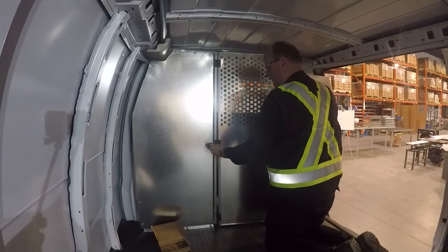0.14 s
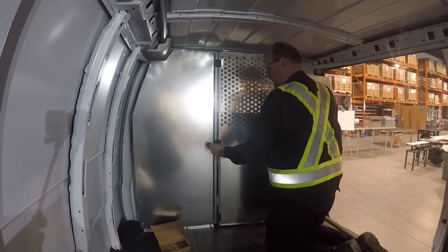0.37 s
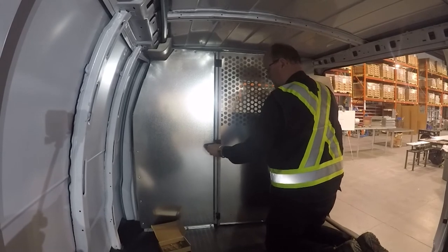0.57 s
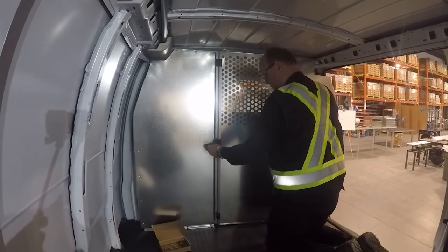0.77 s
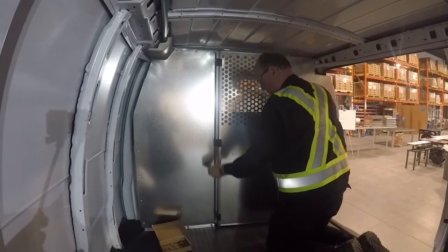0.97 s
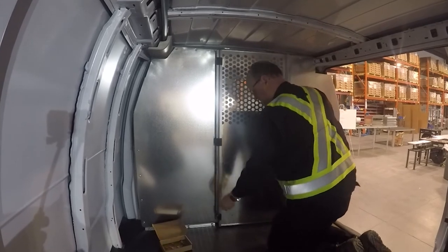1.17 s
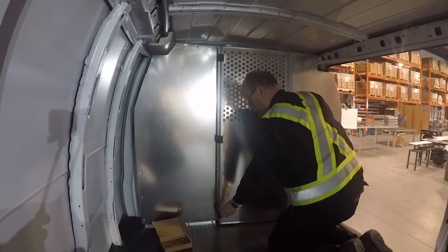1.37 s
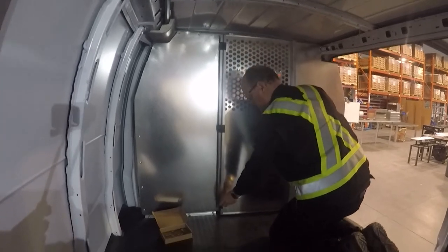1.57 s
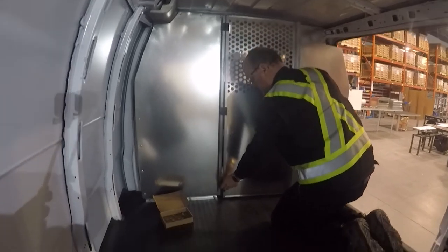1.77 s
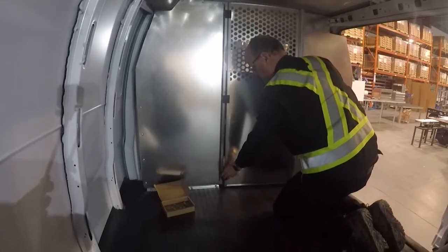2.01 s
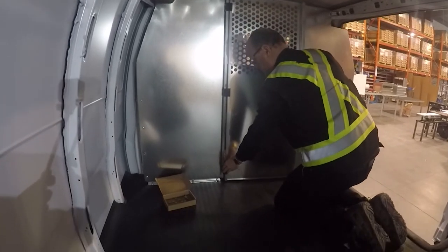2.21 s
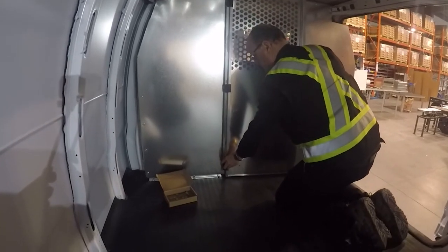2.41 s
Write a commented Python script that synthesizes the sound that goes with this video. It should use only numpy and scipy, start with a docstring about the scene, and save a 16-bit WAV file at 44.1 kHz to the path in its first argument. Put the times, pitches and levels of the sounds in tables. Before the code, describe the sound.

A heavy steel door knocks, grinds and is tapped onto its hinges inside a bare van

```python
"""Inside a bare van, over a quiet hall, a steel door is lowered onto its hinges: it knocks, grinds and is tapped home.
Knocks are a click and a dying chatter, grinding is dense tiny clicks: both ring the steel and the van,
as fading noise plus clear tones. The van's panels boom and its body shudders as random jolts ring low tones.
A soft thud, louder on the left, is a short push ringing low tones; the hall is steady coloured noise."""
import sys
import numpy as np
from scipy import signal
from scipy.fft import rfft, irfft, next_fast_len
from scipy.io import wavfile
from scipy.ndimage import uniform_filter1d

SR = 44100
rng = np.random.default_rng(int(sys.argv[2]) if len(sys.argv) > 2 else 0)


def materialize(psi):
    """Save the field psi as 16-bit PCM at rate SR to the path in sys.argv[1].

    A 1-D psi becomes a single channel; in a 2-D psi each row is a channel.
    """
    bounded = np.clip(np.atleast_2d(psi).T, -1, 1)
    quanta = np.round(bounded * 32767).astype(np.int16)
    wavfile.write(sys.argv[1], SR, quanta)


N = 108045  # samples, 2.45 s


def from_db(db):
    """Turns decibels into a plain factor."""
    return 10 ** (np.asarray(db) / 20)


def rms_one(x):
    """Scales a signal to an rms of 1."""
    return x / np.sqrt(np.mean(x ** 2) + 1e-20)


def low_pass(x, order, hz):
    """Keeps what lies below a pitch."""
    return signal.sosfilt(signal.butter(order, hz, fs=SR, output="sos"), x)


def at_hz(points, hz):
    """Reads a two-column table at a pitch, on a logarithmic pitch scale."""
    points = np.array(points)
    return np.interp(np.log(hz), np.log(points[:, 0]), points[:, 1])


def in_time(rows):
    """Joins timed rows with straight lines: one curve for each column after the time."""
    start_s, *columns = np.transpose(rows)
    t = np.arange(N) / SR
    return np.array([np.interp(t, start_s, column) for column in columns])


def ring(x, hz, t60):
    """One ringing tone, falling 60 dB in t60 seconds; a unit click rings at height 1."""
    r = from_db(-60 / (t60 * SR))
    w = 2 * np.pi * hz / SR
    return signal.lfilter([0, np.sin(w)], [1, -2 * r * np.cos(w), r * r], x + 1e-18)


def pair(two, alike, lean_db):
    """Makes left and right from a shared and an opposed signal; a positive lean favours the left."""
    alike = np.clip(alike, -1, 1)
    sides = np.array([[1], [-1]])
    stereo = np.sqrt(1 + alike) * two[0] + np.sqrt(1 - alike) * two[1] * sides
    return stereo * from_db(lean_db / 2 * sides)


GRAIN_SPREAD_DB = 2  # average extra size of a click, before the cap of 4 times this


def grains(per_s):
    """Uneven clicks of random sign at random moments, rms 1."""
    sizes_db = GRAIN_SPREAD_DB * np.minimum(rng.exponential(1, N), 4)
    sizes = from_db(sizes_db) * rng.choice([-1, 1], N)
    return rms_one(sizes * (rng.random(N) < per_s / SR))


# how alike left and right are: pitch_hz, likeness (1 = same, -1 = opposed)
STEREO_LIKENESS = [(60, 0.7), (150, 0.3), (380, 0.92), (950, -0.055), (2380, 0.46), (5980, 0.38),
                   (9000, -0.25), (15000, -0.55)]
# how far the sound leans to the left: pitch_hz, left_over_right_db
STEREO_LEAN = [(60, -3.5), (150, 0.5), (380, -5.5), (950, 1.5), (2380, 1.5), (5980, 1.5), (9000, -4),
               (15000, -0.5)]
EDGES_HZ = 250 * 4 ** np.arange(0, 3.01, 1 / 8)  # quarter-octave steps


def bands(spectrum, size):
    """Quarter-octave stereo noise bands, coloured by a spectrum, with their centre pitches."""
    white = rng.standard_normal((2, 2, size))
    for k, (low, high) in enumerate(zip(EDGES_HZ, EDGES_HZ[1:])):
        hz = np.sqrt(low * high)
        band = signal.butter(3, [low, high], "band", fs=SR, output="sos")
        two = signal.sosfilt(band, white[k % 2])  # neighbours use different noise
        yield hz, from_db(at_hz(spectrum, hz)) * pair(two, at_hz(STEREO_LIKENESS, hz), at_hz(STEREO_LEAN, hz))


# colour of the quiet hall: pitch_hz, relative_level_db (per Hz)
HALL_COLOUR = [(150, -35), (250, -6), (333, -13.5), (350, -9), (799, -15), (1520, -22), (5270, -30),
               (11400, -29), (14000, -57)]
HALL_FLOOR_DB = -69  # rms


def quiet_hall():
    """The hall is steady noise, built from bands and set to a low level."""
    noise = sum(band for hz, band in bands(HALL_COLOUR, N))
    return from_db(HALL_FLOOR_DB) * rms_one(noise)


JOLTS_PER_S = 300


def shaken(modes, db, alike, lean_db, tilt_db=0):
    """Random jolts ring low tones; the result is evened out and follows a level curve."""
    lowest_hz, highest_hz = modes[0][0], modes[-1][0]
    two = []
    for _ in range(2):
        tones = 0
        for hz, mode_db, t60 in modes:
            gain = from_db(mode_db + tilt_db * np.log2(hz / lowest_hz))
            tones = tones + gain * ring(grains(JOLTS_PER_S), hz, t60)
        two.append(tones)
    two = low_pass(np.array(two), 2, highest_hz * 1.1)
    two = signal.sosfilt(signal.butter(4, lowest_hz * 0.46, "high", fs=SR, output="sos"), two)
    out = pair(two, alike, lean_db)
    loudness = np.sqrt(uniform_filter1d(np.mean(out ** 2, axis=0), size=3000) + 1e-9)
    return from_db(db) * out / loudness


# the van body shaking on its springs: start_s, level_db, left_over_right_db
SHUDDER_LEVELS = [(0.0, -65, -6), (0.4, -64, -8), (0.55, -31, -1.5), (0.62, -37, -5), (0.94, -38.5, -0.5),
                  (1.13, -27, -6.5), (1.15, -33.5, -9), (1.37, -30, -16), (1.43, -43.5, -14.5),
                  (1.48, -41.5, -5.5), (1.64, -38.5, -12), (1.68, -44.5, 3), (1.73, -37, -14),
                  (1.89, -35.5, -7), (1.96, -41, -10.5), (2.45, -51.5, -4)]
# low tones of the body: pitch_hz, relative_level_db, t60_s (time to fall 60 dB)
BODY_TONES = [(32.7, -14.5, 0.34), (51.15, 0.5, 0.15), (78.2, 0, 0.21), (82, -11, 0.14), (120, 3.5, 0.081)]
BODY_LIKENESS = 0.63  # left-right


def body_shudder():
    """The body shakes on its springs: jolts ring its deepest tones."""
    level_db, lean_db = in_time(SHUDDER_LEVELS)
    return shaken(BODY_TONES, level_db, BODY_LIKENESS, lean_db)


# the wall panels booming: start_s, level_db, lift_of_higher_panels_db (per octave)
BOOM_LEVELS = [(0.0, -67, -3), (0.05, -58.5, -6), (0.222, -76, 3), (0.24, -50, 48), (0.3, -34.5, 14.5),
               (0.37, -44, -3), (0.39, -37, 33), (0.47, -26, 8), (0.52, -26, 8), (0.7, -42, 16.5),
               (0.97, -37.5, 5), (0.99, -29.5, 5), (1.34, -46, -7), (1.37, -40.5, -33), (1.49, -61.5, 2.5),
               (1.77, -67.5, 21), (1.88, -33, 29), (2.0, -44.5, -32), (2.05, -57.5, 14), (2.45, -72, 18)]
# tones of the panels: pitch_hz, relative_level_db (before the lift), t60_s
PANEL_TONES = [(167.5, -3, 0.18), (215, -13.5, 0.17), (252.3, -15.5, 0.16)]
PANEL_LIKENESS, PANEL_LEAN_DB = 0.96, -2.1  # left-right likeness; leans to the right


def panel_boom():
    """The wall panels boom: jolts ring tones whose balance changes over time."""
    level_db, lift_db = in_time(BOOM_LEVELS)
    return shaken(PANEL_TONES, level_db, PANEL_LIKENESS, PANEL_LEAN_DB, lift_db)


# start, peak of the knock before the left-right tilt, and where its treble is cut
THUD_S, THUD_DB, THUD_CUT_HZ = 1.359, -38, 610
THUD_T60_S, PUSH_SAMPLES = .07, 500
BUMP_HZ, BUMP_DB, BUMP_T60_S = 95, -17, .16  # low weight, level before its low-pass and left-right tilt


def thud():
    """A soft, rough push rings four short tones and one low bump, louder on the left."""
    push, at = np.zeros(N), int(THUD_S * SR)
    fade = np.linspace(1, 0, PUSH_SAMPLES) ** 2
    push[at:at + PUSH_SAMPLES] = rng.choice([-1, 1], PUSH_SAMPLES) * fade
    knock = sum(rms_one(ring(push, hz, THUD_T60_S)) for hz in (297.6, 345.6, 432, 528))
    dull = low_pass(knock, 4, THUD_CUT_HZ)
    bump = low_pass(ring(np.arange(N) == at, BUMP_HZ, BUMP_T60_S), 2, 2 * BUMP_HZ)
    both = from_db(THUD_DB) * dull / np.abs(dull).max() + from_db(BUMP_DB) * bump
    return both * from_db([[3], [-3]])


# how long the van rings: pitch_hz, t60_s
VAN_DECAY = [(300, 0.13), (1000, 0.25), (2000, 0.38), (4000, 0.33), (8000, 0.27), (14000, 0.083)]
# where the low-mid, mid and treble parts end, air lying above: pitch_hz
PART_TOPS_HZ = [1150, 4000, 8000]
HALL_DB, HALL_STRETCH = -23, 3.66  # slower tail from the open doorway: level at 2 kHz, times the van's t60
BUILD_S = 0.0036  # time constant of the ring building up
CRACK_DB, CRACK_S = 6, .002  # direct sound of each click: level over the ring, time constant


def answer(spectrum, tail_tilt_db):
    """How steel and van answer a click with fading noise: low-mid, mid, treble, air, each of energy 1."""
    t, parts = np.arange(SR) / SR, np.zeros((4, 2, SR))
    for hz, noise in bands(spectrum, SR):
        t60 = at_hz(VAN_DECAY, hz)
        tail_db = HALL_DB + tail_tilt_db * np.log2(hz / 2000)  # tilt per octave
        tail = from_db(tail_db - 60 * t / (t60 * HALL_STRETCH))
        ringing = (from_db(-60 * t / t60) + tail) * (1 - np.exp(-t / BUILD_S))
        crack = from_db(CRACK_DB) * np.exp(-t / CRACK_S)
        gain = from_db(at_hz(spectrum, hz)) * np.sqrt(hz)  # wider bands hold more power
        parts[np.searchsorted(PART_TOPS_HZ, hz)] += gain * rms_one(noise * (ringing + crack))
    return parts / np.sqrt(np.sum(parts ** 2, axis=(1, 2), keepdims=True) / 2)


def sound(force, parts):
    """Plays the four forces through the four answers (convolution) and adds them."""
    size = next_fast_len(N + SR)
    spectrum = np.sum(rfft(force, size)[:, None] * rfft(parts, size), axis=0)
    return irfft(spectrum, size)[:, :N]


SPLIT = .002  # half the left-right gap in pitch, as a share of the pitch
STRIKE_SPREAD_DB = 3.0  # random strength, redrawn every 2000 samples


def chime(force, modes, ring_db):
    """The force rings tones in close pairs, one to a side, each with its own changing strength."""
    out = 0
    for hz, db, t60 in modes:
        luck_db = np.repeat(rng.normal(0, STRIKE_SPREAD_DB, N // 2000 + 1), 2000)[:N]
        drive = force[np.searchsorted(PART_TOPS_HZ, hz)] * from_db(db + ring_db + luck_db)
        out = out + np.array([ring(drive, hz * (1 + side * SPLIT), t60) for side in (-1, 1)])
    return out


CHATTER_PER_S = 830
SWELL = 0.6  # a soft blow's chatter swells in over up to this share of its length


def blows(table, trim_db):
    """Each blow is one sharp click and a dying chatter; returns forces for the four parts."""
    force, chatter, t = np.zeros((4, N)), grains(CHATTER_PER_S), np.arange(N) / SR
    for start_s, db, low_db, treble_db, air_db, length, first in table:
        first = np.clip(first, 0, 1)
        dying = np.clip((start_s + length - t) / length, 0, 1) ** .5 * (t > start_s)
        swelling = np.clip((t - start_s) / (SWELL * length * (1 - first) + 1e-4), 0, 1)
        one = chatter * dying * swelling
        one = one * np.sqrt((1 - first) / np.sum(one ** 2))
        one[int(start_s * SR)] = np.sqrt(first)
        part_db = np.array([[low_db], [0], [treble_db], [air_db]])
        force += from_db(db + trim_db + part_db) * one
    return force


# two hard taps that seat the hinge pin, the second with its rebounds; a list of blows for each tap:
# start_s, level_db (before TAP_DB), low_mid_db, treble_db, air_db (all three over the level),
# chatter_s, first_click_share (of the energy, 0-1)
TAP_BLOWS = [
    [(1.9745, -14.5, -16, 2.8, -4, 0.048, 0.52)],
    [(2.058, -15, -17.5, 0.83, -2.5, .012, 0.96), (2.073, -28, -17, 6.3, 7, 0.016, 0.74),
     (2.088, -20.5, -12, 6.3, -4, 0.018, 0.86)],
]
# colour of hinge and frame: pitch_hz, relative_level_db (per Hz, within each part)
PIN_COLOUR = [(250, -49), (400, -21), (600, -11.5), (800, -11), (1000, -11), (1280, -3.5), (1600, -11.5),
              (2500, -6.5), (3500, 2), (4100, -8), (4600, 0.5), (5600, -8), (7400, 0.5), (8800, 14),
              (10000, 9.5), (15000, -15)]
# tones of hinge and frame: pitch_hz, first_tap_db, second_tap_db (both before PIN_RING_DB), t60_s
PIN_TONES = [(545, 3, 3, .5), (622, 14, 0, .22), (1061, -8, 3, .65), (1836, -20, -11, .5),
             (1945, -2, -12, .25), (2318, -18, -15, 1.1), (2520, -1, -12, .25), (3107, -14, -14, .8),
             (3180, -6, -4, .25), (3360, -8, -14, .75), (3811, -20, -18, .85), (3480, -12, -6, .36),
             (3690, -12, -4, .45), (4500, -5, -8, .2), (4608, -8, 1, .28), (6778, -9, -4, .21),
             (7150, -2, -5, .2), (7700, -4, -5, .18)]
TAP_DB, PIN_RING_DB = 25, -38  # added to the blows; added to the tones
PIN_TILT_DB = -10.5  # slope of the slower tail per octave


def hinge_taps():
    """The pin is tapped home: hard blows ring hinge and frame, each tap with its own mix of tones."""
    taps = [blows(tap, TAP_DB) for tap in TAP_BLOWS]
    out = sound(sum(taps), answer(PIN_COLOUR, PIN_TILT_DB))
    for k, tap in enumerate(taps):
        tones = np.array(PIN_TONES)[:, [0, 1 + k, 3]]
        out += chime(tap, tones, PIN_RING_DB)
    return out


# strokes of steel grinding on steel, and a faint rub; a list of rows for each stroke:
# start_s, level_db (before GRIND_DB), low_mid_db, treble_db, air_db (all three over the level)
GRIND_STROKES = [
    [(0.41, -25, -1.5, -2, -7), (0.44, -25.5, -2.5, 4.5, -5), (0.49, -24.5, -5.5, 5, -1),
     (0.56, -31.5, -3, -7, -19)],
    [(0.81, -40.5, 4.5, -7.5, -13), (0.88, -34, -0.5, -8, -20), (0.992, -32, -2.5, -12, -27.5),
     (1.12, -46, -14.5, -3, -14)],
    [(1.25, -62, -5.5, -10.5, -25), (1.396, -79, 6, 7.5, 2.5), (1.46, -74, -5, -6.5, -15)],
]
GRAINS_PER_S, GRIND_FADE_S, GRIND_DB = 2700, 0.0027, -3.5
CATCH_COUNT, CATCH_DB = 200, 4.5  # random turns over the whole scene, typical swing


def grinding():
    """Steel catches and slips along the pins: dense clicks of wavering level under each stroke."""
    force, t = np.zeros((4, N)), np.arange(N) / SR
    for rows in GRIND_STROKES:
        db, low_db, treble_db, air_db = in_time(rows)
        to_nearest_end = np.minimum(t - rows[0][0], rows[-1][0] - t)
        on = np.clip(to_nearest_end / GRIND_FADE_S, 0, 1)
        part_db = np.array([low_db, 0 * db, treble_db, air_db])
        force += on * from_db(GRIND_DB + db + part_db)
    catch = signal.resample(rng.standard_normal(CATCH_COUNT), N)
    return force * grains(GRAINS_PER_S) * from_db(CATCH_DB * catch)


# knocks on the door: start_s, level_db (before KNOCK_DB), low_mid_db, treble_db, air_db (all three
# over the level), chatter_s, first_click_share (of the energy, 0-1)
DOOR_KNOCKS = [(0.2304, -17.5, -10, -10, -24, 0.031, 0.3), (0.38, -21, -3, -14.5, -34, 0.0089, 1),
               (0.4015, -16.5, -7, -6, -23.5, 0.018, 0.8), (0.4189, -9, -17.5, -4, -10, 0.042, 0.39),
               (0.6968, -29.5, -6, 1.5, -10.5, 0.063, 0.96), (0.8006, -30, -3.5, -0.5, -15.5, 0.0064, 1),
               (1.0444, -28.5, -1.5, -2, -13.5, 0.028, 0.73), (1.5135, -40, -16, -18.5, -43, 0.089, 0.68),
               (1.6694, -44.5, -3, -26.5, -27.5, 0.049, 0.057), (1.777, -25.5, -7, -10, -50, 0.071, 0.15),
               (1.8412, -28.5, -2, -2.5, -16, 0.018, 0.38), (1.9505, -31, -27, -6.5, -21.5, 0.034, 0.15)]
# colour of door and van: pitch_hz, relative_level_db (per Hz, within each part)
STEEL_COLOUR = [(250, -5.5), (310, -5), (400, -2), (520, -1.5), (640, -9.5), (750, -4), (950, -1.5),
                (1300, -2), (2500, -4), (3400, -1.5), (4700, -6.5), (7000, -2), (8500, -13), (10500, -21.5),
                (15000, -48)]
# tones of the door: pitch_hz, level_db (before DOOR_RING_DB), t60_s
DOOR_TONES = [(452.5, 10, 0.24), (520.5, 3.5, 0.2), (1274, -5, 0.6), (1511, 3.5, 0.12), (2086, -6, 0.18),
              (2501, 6.5, 0.19), (2730, -8.5, 0.16), (3275, -4, 0.17), (3674, 4.5, .2)]
KNOCK_DB, DOOR_RING_DB = 22, -44  # added to the knocks; added to the tones
DOOR_TILT_DB = -9  # slope of the slower tail per octave


def steel_door():
    """Knocks and grinding ring the sheet steel and the van, as fading noise and as clear tones."""
    force = blows(DOOR_KNOCKS, KNOCK_DB) + grinding()
    return sound(force, answer(STEEL_COLOUR, DOOR_TILT_DB)) + chime(force, DOOR_TONES, DOOR_RING_DB)


def scene():
    """Adds all the layers, from the background to the door."""
    van = body_shudder() + panel_boom()
    return quiet_hall() + van + thud() + hinge_taps() + steel_door()


def record(dry):
    """Cuts the top steeply, above 15700 Hz."""
    return signal.sosfilt(signal.cheby2(12, 70, 15700, fs=SR, output="sos"), dry)


dry = scene()
out = record(dry)
materialize(out)
```